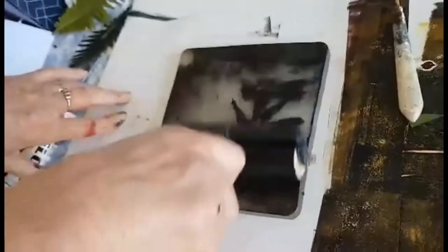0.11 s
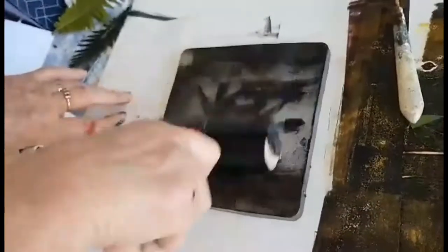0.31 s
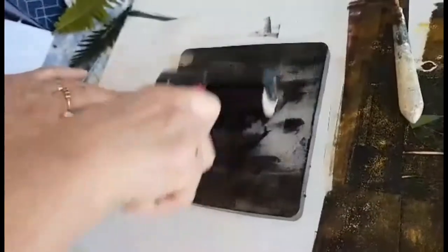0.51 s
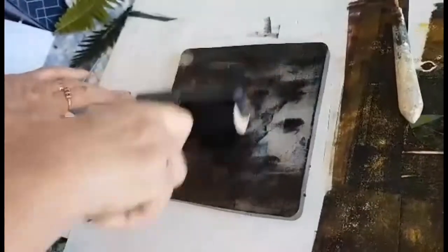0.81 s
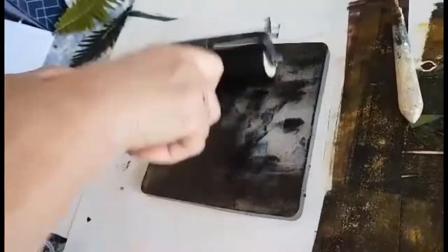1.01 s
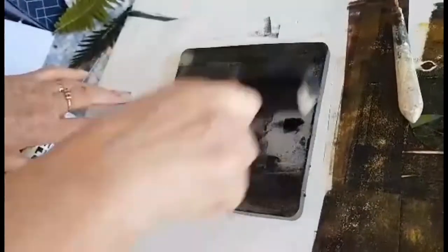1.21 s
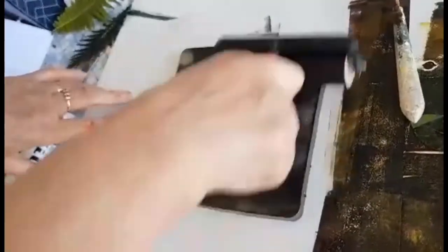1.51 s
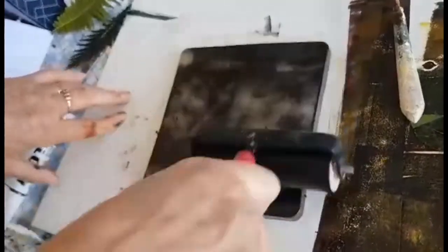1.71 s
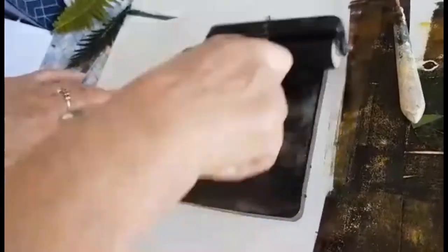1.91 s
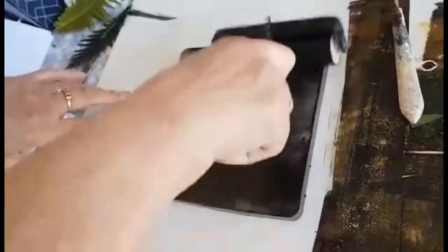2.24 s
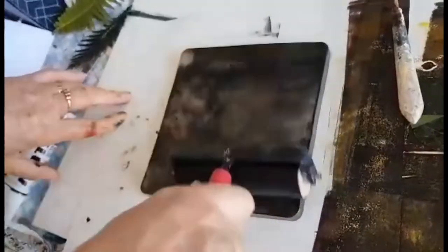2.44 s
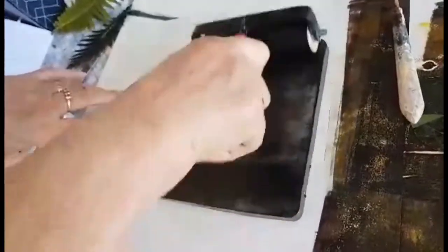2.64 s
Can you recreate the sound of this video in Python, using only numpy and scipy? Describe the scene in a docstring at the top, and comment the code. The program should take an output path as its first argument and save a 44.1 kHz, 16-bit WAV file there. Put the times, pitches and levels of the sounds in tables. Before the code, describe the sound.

Sticky crackling of an ink roller going back and forth, clacking and thumping on a table.

```python
"""A rubber roller on an inked plate on a wooden table; small quiet room, phone microphone close by.
We come in mid-stroke, the table still ringing faintly under the hiss of peeling ink.
From 0.2 s the roller lands twelve times, quickening after 1.5 s. Each landing thumps the table top,
the tacky ink ticks and the roller's frame clacks; then the stroke rolls out, hissing and rumbling,
with stray clacks and ticks on the way. The last landing, near 2.7 s, is barely a touch."""
import sys
import numpy as np
from scipy import signal
from scipy.fft import rfft, irfft
from scipy.io import wavfile
from scipy.ndimage import uniform_filter1d

SR = 44100
rng = np.random.default_rng(int(sys.argv[2]) if len(sys.argv) > 2 else 0)


def log_audio(samples):
    """Write samples as a 16-bit WAV file to the path given in sys.argv[1]."""
    # one column per channel
    frames = np.atleast_2d(samples).T
    # limit to full scale, then quantise
    limited = np.clip(frames, -1, 1)
    pcm = np.round(limited * 32767).astype(np.int16)
    wavfile.write(sys.argv[1], SR, pcm)


N = 123480  # 2.8 s


def undb(db):
    return 10 ** (np.asarray(db) / 20)


def fall(t, t60):
    return 1000. ** (-t / t60)


def colour(x, spectrum):
    """Shape x to a spectrum of (f/Hz, level/dB) points, rms 1."""
    hz, db = np.array(spectrum).T
    f = np.maximum(np.arange(N // 2 + 1) * SR / N, 1)
    y = irfft(rfft(x) * undb(np.interp(np.log(f), np.log(hz), db, left=-90, right=-90)), N)
    return y / y.std()


def band(x, hz, width_hz):
    """Band-pass applied twice."""
    peak = signal.iirpeak(min(hz, 17000), max(hz / width_hz, .3), fs=SR)
    return signal.lfilter(*peak, signal.lfilter(*peak, x))


def stereo(make, alike):
    """Left and right from two draws of make(), with correlation alike."""
    return np.sqrt((1 + alike) / 2) * make() + np.sqrt((1 - alike) / 2) * make() * np.array([[1], [-1]])


def pan(db):
    """Gains that put the left channel db above the right."""
    return undb([[db / 2], [-db / 2]])


def add(out, x, start_s, pan_db):
    i = int(start_s * SR)
    x = np.atleast_2d(x)[:, :N - i] * pan(pan_db)
    out[:, i:i + x.shape[1]] += x


# Background spectrum of the room: f/Hz, level/dB
ROOM_SPECTRUM = [(18, -58), (30, -13), (217, 0), (608, -17.5), (1940, -24), (3480, -24), (9730, -33),
                 (10800, -45.5), (12700, -29), (15200, -51), (16500, -60)]


def room_tone():
    """The quiet room: faint, steady air all round the microphone."""
    return undb(-70.5) * stereo(lambda: colour(rng.standard_normal(N), ROOM_SPECTRUM), alike=0.17)


# Modes of the table top: f/Hz, free t60/s, lag/s, signed weight
TABLE_MODES = [(95.6, 0.26, 0.000074, 0.68), (138.2, 0.3, 0.0022, 0.76), (189, 0.36, 0.00093, -0.72),
               (247.6, 0.14, 0.0015, 1), (288.5, 0.3, 0.00094, 0.94), (418, 0.16, 0.00059, 1),
               (570, 0.12, 0.00079, -0.76)]
# Landings of the roller: t/s, level/dB for each of the seven modes, pan/dB
LANDINGS = [(0.2136, -25, -21.5, -33, -28.5, -39, -44, -60, 3.5),
            (0.4562, -31.5, -21, -41.5, -33, -40, -46.5, -50.5, 3),
            (0.7306, -36, -21.5, -32, -29, -36, -43, -42, 2.8),
            (1.009, -52, -53, -30, -35.5, -42.5, -49.5, -69, 2.3),
            (1.2769, -35, -28, -43, -35, -46, -45.5, -47, 3.7),
            (1.5567, -38, -28.5, -43, -39.5, -42, -49.5, -52, 4),
            (1.7491, -34.5, -39, -36, -44, -72, -46, -38.5, 2.5),
            (1.9562, -27.5, -24, -37.5, -37.5, -43, -37.5, -42, 3.4),
            (2.133, -38, -26, -29.5, -33.5, -42, -40, -43.5, 3.1),
            (2.2944, -36.5, -33, -46, -40.5, -47.5, -46, -51, 3.4),
            (2.491, -35, -35, -38, -45, -52, -45.5, -53, 3.1),
            (2.6569, -55, -54, -51.5, -68, -64, -75, -82, 2.3)]


def table_thumps(out):
    """At each landing the wooden top swells, rings free, then is damped by the pressed plate."""
    rise_s, free_s, damped_t60_s = .003, 0.045, 0.065
    t = np.arange(SR // 4) / SR
    # the second mode still rings from a landing 29 ms before we come in
    early_ring = undb(-31.5) * fall(t + 0.029, t60=.15) * np.sin(2 * np.pi * TABLE_MODES[1][0] * t)
    add(out, early_ring, start_s=0, pan_db=3)
    envelope = (1 - np.exp(-t / rise_s)) * fall(np.maximum(t - free_s, 0), damped_t60_s)
    for start_s, *levels_db, pan_db in LANDINGS:
        ring = sum(weight * undb(db) * fall(t, t60) * np.sin(2 * np.pi * hz * (t - lag))
                   for db, (hz, t60, lag, weight) in zip(levels_db, TABLE_MODES))
        add(out, envelope * ring, start_s, pan_db)


def peeling_ink(spectrum, bands_hz):
    """Dense tiny snaps over noise; each band flickers on its own as patches of ink let go."""
    snaps_per_s, spread_db = 1700, 1.5
    patches_per_s, flicker_db = 40, 3
    snaps = (rng.random(N) < snaps_per_s / SR) * undb(spread_db * rng.exponential(size=N))
    grains = colour(rng.standard_normal(N) * (1 + 4.14 * snaps), spectrum)
    hold = int(SR / patches_per_s)
    patches = np.zeros(N)
    for i, hz in enumerate(bands_hz):
        wander = uniform_filter1d(np.repeat(rng.standard_normal(N // hold + 1), hold), hold)[:N]
        patches += (-1) ** i * band(grains, hz, 0.42 * hz) * undb(flicker_db * wander)
    return patches / patches.std()


# Spectra of peeling ink, rubber on the plate and the rumbling table: f/Hz, level/dB
HISS_SPECTRUM = [(1760, -33.5), (3000, -1), (3340, -8.5), (3610, -22), (6440, -2), (7010, -2), (13900, 4.5),
                 (16200, -10), (16500, -29)]
RUBBER_SPECTRUM = [(290, -12), (500, -3), (763, -7.5), (860, -7), (934, -4), (1240, -6.5), (1530, -5.5),
                   (1670, -5.5), (2540, -18.5), (4500, -77), (5850, -46), (9900, -120)]
RUMBLE_SPECTRUM = [(15, -60), (25, -30), (45, -10), (84, 2), (151, 5.5), (191, 1.5), (334, -8.5), (403, -9),
                   (454, -28.5), (600, -28.5), (780, -49), (1320, -120)]
# Strokes, one curve of points each: t/s, hiss level/dB, rubber level/dB, rumble level/dB
STROKES = [
    [(0.012, -60, -53, -43), (0.03, -63.5, -61.5, -60), (0.06, -62.5, -58.5, -54), (0.131, -79, -68.5, -61),
     (0.201, -77, -99, -74)],
    [(0.226, -75, -43.5, -50), (0.244, -71, -57, -55), (0.273, -65, -70, -47), (0.33, -64, -63, -55),
     (0.387, -87, -86, -61), (0.444, -75.5, -74.5, -87)],
    [(0.468, -60, -64.5, -56), (0.486, -64, -58, -69), (0.516, -63.5, -63.5, -56.5), (0.584, -66, -72, -56),
     (0.651, -80, -83, -62.5), (0.719, -74.5, -74, -74)],
    [(0.743, -57.5, -49, -56), (0.761, -64, -57.5, -52), (0.791, -63.5, -64, -49), (0.843, -63, -70, -58.5),
     (0.894, -68.5, -57, -53.5), (0.946, -81, -71, -61), (0.998, -81, -95, -84)],
    [(1.022, -74, -58, -38.5), (1.04, -65.5, -55.5, -59), (1.07, -66, -67, -57), (1.135, -60, -66.5, -59),
     (1.201, -83, -83, -75), (1.266, -83, -99, -90)],
    [(1.29, -62, -46.5, -52), (1.308, -62.5, -60, -36), (1.338, -65.5, -64.5, -58), (1.39, -65.5, -59, -62),
     (1.441, -68.5, -75, -63), (1.493, -91, -85, -71.5), (1.545, -95, -103, -69)],
    [(1.569, -57.5, -47.5, -41), (1.587, -65, -63.5, -43.5), (1.617, -54.5, -56, -51.5),
     (1.677, -79, -70, -58), (1.738, -65, -89, -89)],
    [(1.762, -56, -46, -46.5), (1.78, -63.5, -53, -52), (1.81, -59.5, -58.5, -58.5),
     (1.877, -58, -66, -68.5), (1.945, -89, -72, -65)],
    [(1.969, -51.5, -40, -68), (1.987, -62, -56, -41), (2.017, -60, -70, -54), (2.069, -76, -59, -56),
     (2.121, -84, -80, -60)],
    [(2.145, -49, -39, -74), (2.163, -58.5, -53, -56), (2.193, -54, -58, -47.5), (2.238, -64, -69, -60.5),
     (2.282, -69, -62, -52.5)],
    [(2.306, -56, -51.5, -41), (2.324, -60, -62.5, -57), (2.354, -61, -58.5, -57.5), (2.417, -69, -70, -66),
     (2.48, -86, -80, -69)],
    [(2.504, -51, -45, -58), (2.522, -54.5, -55.5, -55), (2.552, -53.5, -58, -53),
     (2.598, -62.5, -72.5, -68.5), (2.644, -70.5, -68.5, -84)],
    [(2.668, -64.5, -53.5, -62), (2.686, -64, -64, -61), (2.716, -62, -60, -79), (2.752, -62.5, -70, -65),
     (2.788, -70, -72.5, -87)],
]


def rolling():
    """Ink hiss, rubber on plate and table rumble follow each stroke, starting at once on touch."""
    lead_s, soft_start_db = .01, -2.5  # the roller touches ahead of each curve and starts turning softly
    points = []
    for stroke in STROKES:
        start_s, hiss_db, rubber_db, rumble_db = stroke[0]
        touch_s = start_s - lead_s
        if points:  # the previous stroke's levels hold until 1 ms before the touch
            points.append((touch_s - .001, *points[-1][1:]))
        points += [(touch_s, hiss_db, rubber_db + soft_start_db, rumble_db), *stroke]
    times, *curves_db = np.array(points).T
    times = np.maximum.accumulate(times)
    t = np.arange(N) / SR
    hiss_gain, rubber_gain, rumble_gain = (undb(np.interp(t, times, db)) for db in curves_db)
    hiss_bands_hz = [3400, 4480, 5700, 7320, 9000, 10630, 13000, 15600]
    rubber_bands_hz = [450, 650, 950, 1400, 2000, 2900, 4000]
    hiss = stereo(lambda: peeling_ink(HISS_SPECTRUM, hiss_bands_hz), alike=0.067) * pan(0.6)
    rubber = stereo(lambda: peeling_ink(RUBBER_SPECTRUM, rubber_bands_hz), alike=0.78) * pan(2.2)
    rumble = stereo(lambda: colour(rng.standard_normal(N), RUMBLE_SPECTRUM), alike=0.94) * pan(2.8)
    return hiss_gain * hiss + rubber_gain * rubber + rumble_gain * rumble


# Modes of the roller's frame, stirred by every clack: f/Hz, level/dB, t60/s
FRAME_MODES = [(926, -22, 0.045), (1404.5, -29, 0.088), (1844, -6.5, 0.017), (2211, -17.5, 0.017),
               (2877, -20.5, 0.018), (3497, -29.5, 0.091)]
# Clacks of the frame: t/s, level/dB, f/Hz, t60/s, rattle/dB re level, pan/dB
CLACKS = [(0.044, -46.5, 1590, 0.024, -10, -2), (0.083, -53, 1140, 0.028, -21, 4),
          (0.113, -46, 1340, 0.023, -20, 2.5), (0.22, -27, 1647, 0.019, -2.5, 0.0),
          (0.223, -23.5, 1404, 0.017, -9.5, 2), (0.456, -45, 1400, 0.02, -11, 3),
          (0.465, -28.5, 1600, 0.016, -13.5, 2), (0.733, -35, 1070, 0.0088, -5, 5.5),
          (0.854, -49, 1840, 0.025, -12, 2), (0.901, -49, 984, 0.037, -17, 2),
          (0.906, -50, 1000, 0.027, -8, -1), (1.013, -44, 1120, 0.017, -8, 1),
          (1.022, -34.5, 1490, 0.019, -6, 0.5), (1.13, -49.5, 1010, 0.016, -6, 3.0),
          (1.28, -39, 1620, 0.014, -6.5, -3), (1.288, -30.5, 1657, 0.028, -16, 2),
          (1.375, -59, 1330, 0.02, -15, -2), (1.384, -50.5, 1690, 0.023, -13, -2),
          (1.444, -51.5, 1150, 0.02, -10, 3), (1.557, -48, 1340, 0.017, -4, 7),
          (1.566, -30.5, 1560, 0.021, -12, 2), (1.643, -43, 1330, 0.029, -16, 1),
          (1.709, -50, 2230, 0.013, -12.5, 7), (1.751, -35.5, 1000, 0.013, -6.5, 2),
          (1.761, -28.5, 1660, 0.014, -13.5, 0.0), (1.886, -38.5, 1630, 0.027, -16, -2.5),
          (1.892, -39.5, 1115, 0.034, -14.5, 5.5), (1.953, -46, 1380, 0.023, -18, 13),
          (1.964, -26.5, 1470, 0.019, -17, 1), (2.063, -57, 1060, 0.033, -18, 12),
          (2.134, -23.5, 1510, 0.012, -4, -0.5), (2.146, -27.5, 1390, 0.012, -4, 6.5),
          (2.266, -45.5, 1300, 0.02, -12, 2), (2.271, -42.5, 1210, 0.02, -18, 3),
          (2.301, -46.5, 1493, 0.024, -11, -9), (2.431, -53.5, 1280, 0.038, -10, 4.0),
          (2.491, -47.5, 1000, 0.02, -6, 10), (2.501, -43, 1560, 0.023, -23, -6),
          (2.638, -54, 1500, 0.025, -25, -3), (2.662, -68, 1260, 0.02, -8, 10)]


def frame_clacks(out):
    """The roller's frame gives a short pitched knock, rings, and rattles with a faint tail."""
    tail_db, tail_t60_s = -23, 0.2
    t = np.arange(SR // 6) / SR
    attack = np.minimum(t / 0.0013, 1) ** 2
    ring = sum((-1) ** k * undb(db) * fall(t, t60) * np.sin(2 * np.pi * hz * t)
               for k, (hz, db, t60) in enumerate(FRAME_MODES))
    for start_s, db, hz, t60, rattle_db, pan_db in CLACKS:
        knock = np.sin(2 * np.pi * hz * t) * fall(t, t60)
        rattle = stereo(lambda: 4 * band(rng.standard_normal(len(t)), 1115, width_hz=2195), alike=0.31)
        decay = undb(rattle_db) * fall(t, t60) + undb(tail_db) * fall(t, tail_t60_s)
        add(out, undb(db) * attack * (knock + ring + decay * rattle), start_s, pan_db)


# Ticks of the tacky ink: t/s, level/dB, f/Hz, crackle/dB re level, t60/s, pan/dB
INK_TICKS = [(0.067, -46.5, 6900, -3.5, 0.014, 11), (0.1655, -62, 11900, -3, 0.011, 3.5),
             (0.2138, -29.5, 6000, -1, 0.0085, -2), (0.2234, -37, 5450, -9, 0.013, 5),
             (0.3153, -36, 6700, -2.5, 0.0097, 3.5), (0.4567, -28, 6700, 1, 0.0092, 2),
             (0.4768, -28, 6660, -14, 0.0093, 4.5), (0.5674, -57, 11300, 1, 0.013, 4),
             (0.732, -31, 6230, -3.5, 0.009, -3), (0.847, -42, 6420, -4.5, 0.011, 16.5),
             (1.0117, -34, 6600, -10, 0.016, 8), (1.126, -36, 11900, 5.5, 0.011, 0),
             (1.2786, -41.5, 8800, 0, 0.011, 2), (1.4065, -41, 9530, 2.5, 0.012, 1),
             (1.5576, -36, 5900, -2.5, 0.0087, -4), (1.7088, -38.5, 13700, 3.5, 0.01, 0),
             (1.748, -37, 11900, 5.5, 0.011, -3), (1.8535, -36, 10370, -0.5, 0.011, 11),
             (1.8917, -41, 12300, 5.5, 0.012, -2), (1.9549, -32.5, 8800, 0.5, 0.012, 2),
             (2.134, -22, 14450, -2.5, 0.011, 3), (2.1404, -36, 14900, -1, 0.012, 1.5),
             (2.2144, -48, 12300, 3, 0.012, 5), (2.2653, -46, 7800, -6, 0.011, -3),
             (2.2964, -38.5, 6180, -2.5, 0.011, 6.5), (2.4937, -37, 8700, 5.5, 0.011, 0.0)]


def ink_ticks(out):
    """Ink threads snap: a bright ring inside a few ms of broad crackle, then a faint tail."""
    tail_db, tail_t60_s = -26.5, 0.26
    t = np.arange(SR // 10) / SR
    treble = signal.butter(3, 5500, "high", fs=SR)
    for start_s, db, hz, crackle_db, t60, pan_db in INK_TICKS:
        def snap():
            pitched = 3 * band(rng.standard_normal(len(t)), hz, width_hz=1080)
            crackle = signal.lfilter(*treble, rng.standard_normal(len(t)))
            return pitched + undb(crackle_db) * crackle
        envelope = np.minimum(t / 0.0025, 1) * (fall(t, t60) + undb(tail_db) * fall(t, tail_t60_s))
        ring = 0.24 * np.minimum(t / 0.0018, 1) * fall(t, t60) * np.sin(2 * np.pi * hz * t)
        add(out, undb(db) * (envelope * stereo(snap, alike=0.1) + ring), start_s, pan_db)


def scene():
    """The sound at the table, with the roller a little left of centre."""
    out = room_tone()
    table_thumps(out)
    out += rolling()
    frame_clacks(out)
    ink_ticks(out)
    return out


def record(dry):
    """The phone's left port hears slightly later; the phone drops the deep bass and cuts the top."""
    lag_samples, low_cut_hz, top_hz = 3, 42.2, 16300
    left = np.r_[np.zeros(lag_samples), dry[0, :-lag_samples]]
    ports = signal.lfilter(*signal.butter(2, low_cut_hz, "high", fs=SR), np.array([left, dry[1]]))
    return signal.sosfilt(signal.ellip(8, .2, 70, top_hz, fs=SR, output="sos"), ports)


dry = scene()
out = record(dry)
log_audio(out)
```